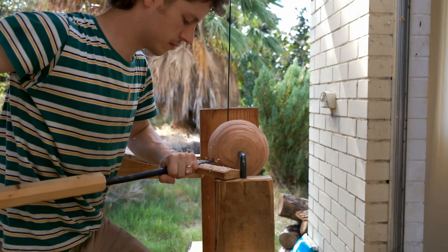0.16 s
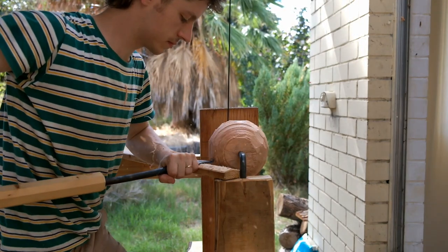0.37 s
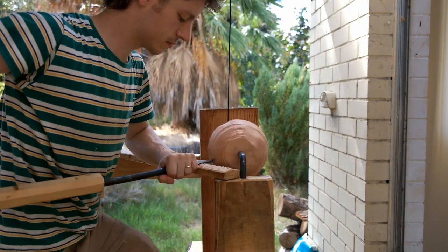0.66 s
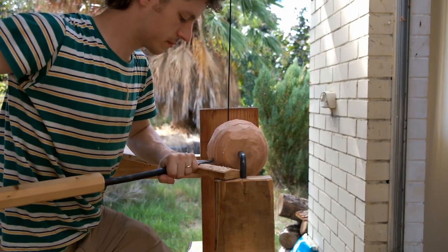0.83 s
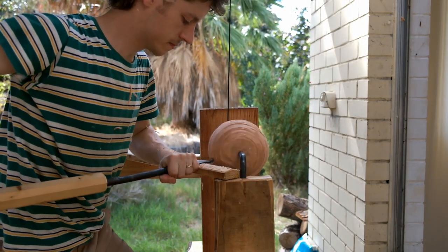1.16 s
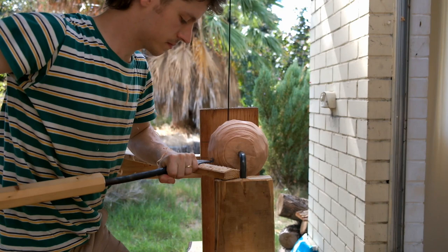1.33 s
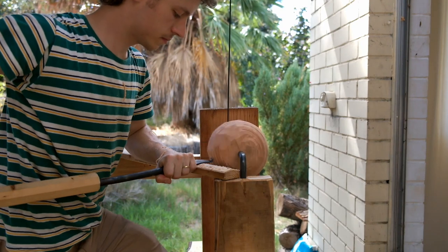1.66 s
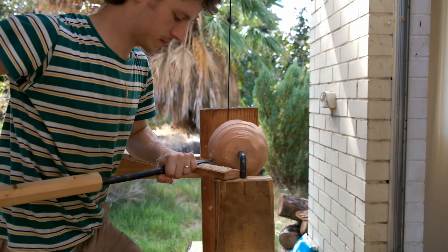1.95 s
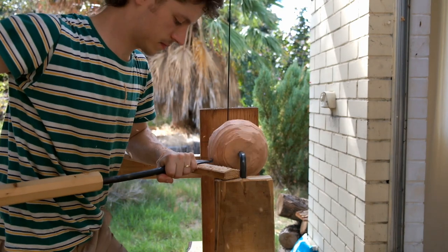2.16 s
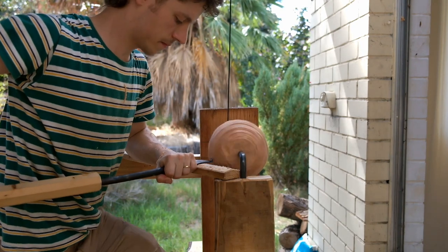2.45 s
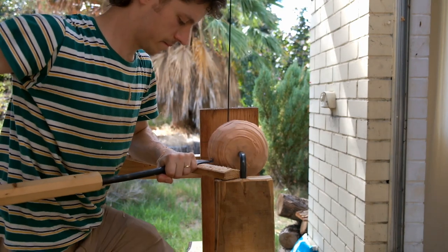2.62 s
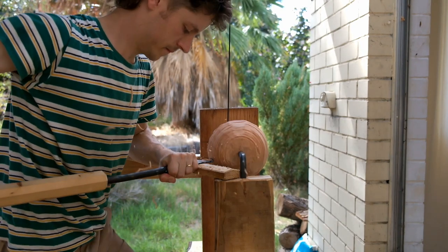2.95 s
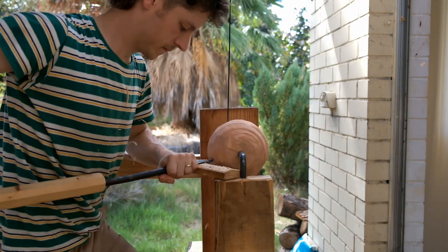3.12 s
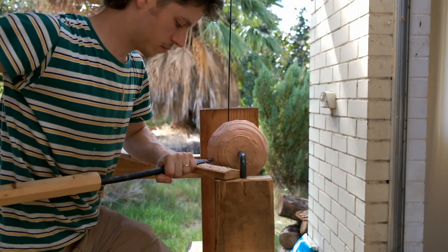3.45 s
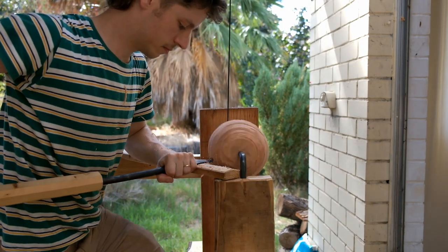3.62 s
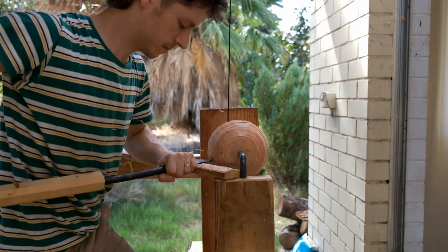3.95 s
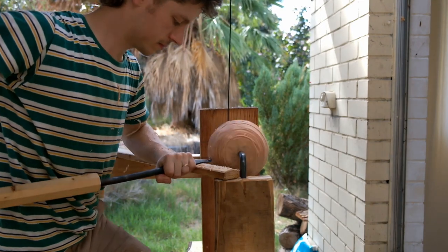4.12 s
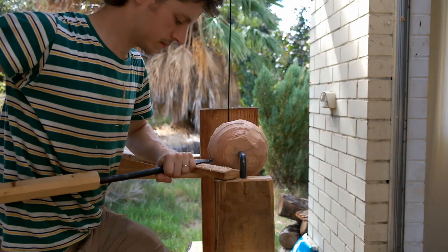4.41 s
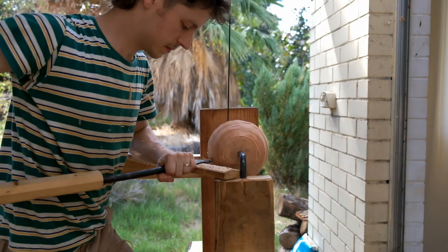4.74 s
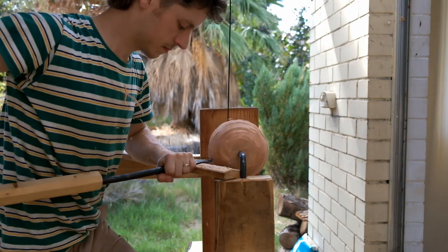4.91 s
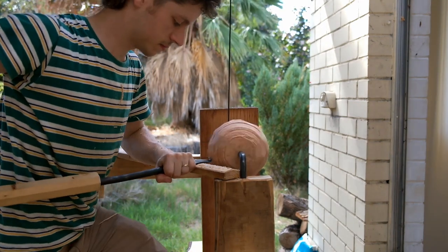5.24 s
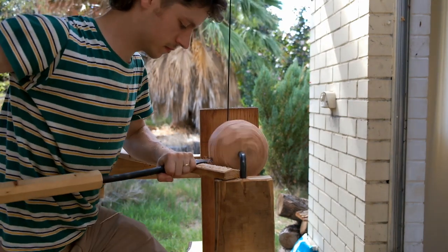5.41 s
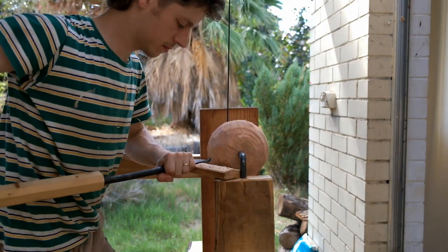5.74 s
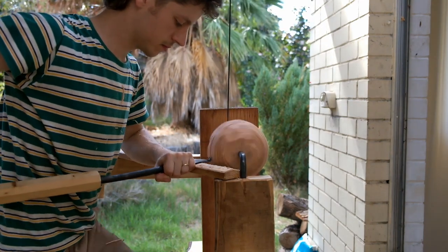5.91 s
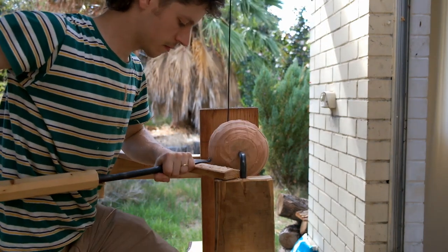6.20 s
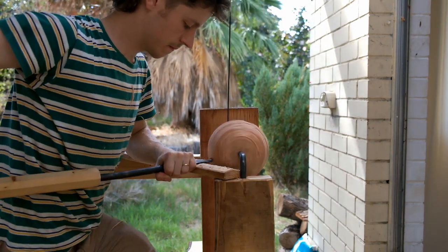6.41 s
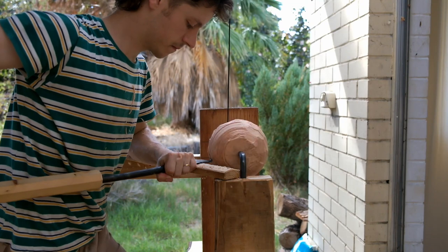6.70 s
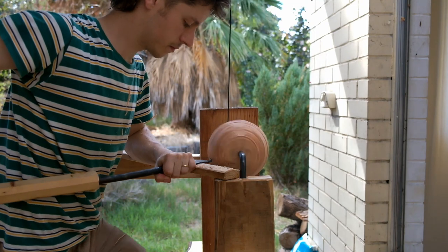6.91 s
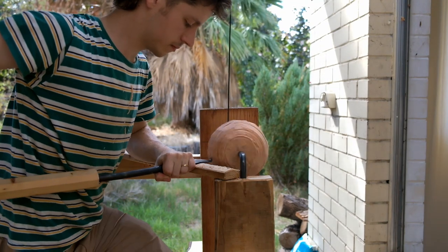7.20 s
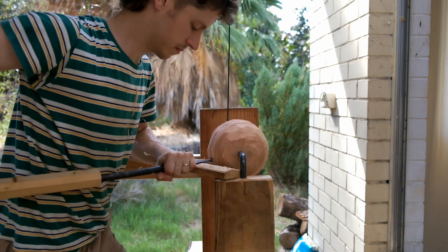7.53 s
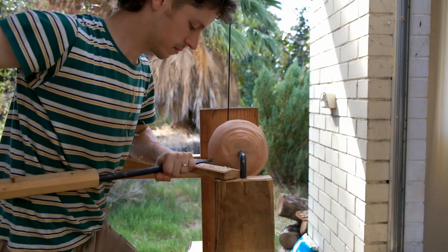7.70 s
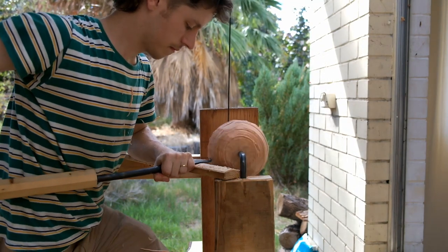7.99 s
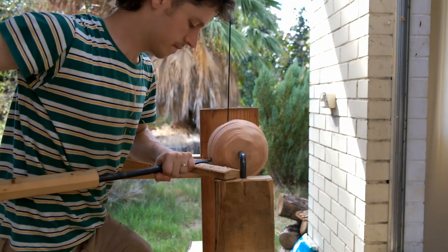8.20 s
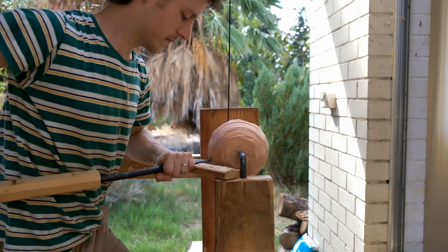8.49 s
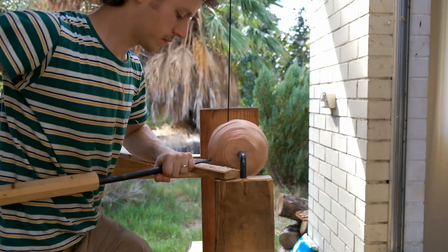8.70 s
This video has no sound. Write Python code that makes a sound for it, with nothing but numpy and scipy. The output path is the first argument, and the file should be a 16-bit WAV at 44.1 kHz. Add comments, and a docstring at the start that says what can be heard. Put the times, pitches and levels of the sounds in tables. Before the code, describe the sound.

Close mono sound of a foot-powered wood lathe on a brick porch. A stroke already under way at 0 s crunches briefly; further bursts of rasping, crackling wood fibre begin near 0.9, 1.9, 2.7, 3.6, 4.5, 5.4, 6.3, 7.3 and 8.2 s. Each lasts about 0.3 to 0.4 s and stutters as separate chips, bright and woody at full speed, heavier as the blank slows. The strongest bite comes near 2.9 s; strokes after 5.3 s are thumpier. In the gaps, wooden knocks with a slight steel ring fall near 1.4, 2.2, 3.9, 5.5 and 8.5 s, most firmly around 7.35 and 7.7 s. Small ticks, pattering shavings and short hoarse squeaks of the gouge rubbing, as at 3.5 and 7.1 s, precede strokes. A short porch tail follows everything. Soft garden noise rises slightly, with a faint wavering far engine and low rumble at the start and near 8.3 s.

```python
"""Pole lathe under a brick porch.

A gouge cuts a bowl blank in ten treadle strokes. Each bite is a run of chips: random fibre snaps, spread by
bending waves and rung by the lathe's resonances, brighter at full spin and heavier as the blank slows.
Decaying modes and noise make knocks, ticks and pattering shavings; dense snaps make the gouge slide.
The porch adds a short noise tail; filtered noise and sines murmur as garden, far engine, hum and rumble."""
import sys
import numpy as np
from scipy import signal
from scipy.fft import rfft, irfft, next_fast_len
from scipy.io import wavfile
from scipy.ndimage import map_coordinates

SR = 44100
rng = np.random.default_rng(int(sys.argv[2]) if len(sys.argv) > 2 else 0)


def generate_wav(sig):
    """Save sig (samples, or channels by samples) to the path in sys.argv[1] as 16-bit PCM at SR."""
    pcm = np.round(np.clip(np.atleast_2d(sig).T, -1, 1) * 32767).astype(np.int16)
    wavfile.write(sys.argv[1], SR, pcm)


N = 390726

# Lower against upper ring as the gouge works across the blank.
# Each row: time in seconds, lower ring in dB (the upper ring takes the opposite).
RING_BALANCE = [(0, 1.5), (2.2, 0.5), (3.8, 1), (6.5, 0.4), (8.4, -2.5)]


def cutting(frame_db=1.5):
    """Each chip is a burst of fractures that spreads through the wood and rings the lathe."""
    force = np.zeros(N)
    for start_s, length_s, level_db, (thump_db, body_db, crack_db) in chips():
        snaps = fractures(length_s, rate_per_s=750, spread_db=6.0)
        burst = signal.fftconvolve(snaps, bending())
        ring_db = np.interp(start_s, *np.transpose(RING_BALANCE))
        colour = [(150, thump_db + frame_db), (380, thump_db),
                  (650, body_db), (1150, body_db),
                  (1700, ring_db), (2400, ring_db),
                  (3200, -ring_db), (3700, -ring_db), (4500, crack_db)]
        chip = coloured(burst, lambda hz: amp(along(colour, hz)), size=2048)
        add(force, start_s, amp(level_db) * chip)
    return lathe(force, broad_db=-7.0)


# Bites of the edge. Each row: start in seconds, length in seconds, relative level in dB.
BITES = [(0, .066, -22), (.128, .026, -13), (0.153, 0.036, -13), (0.239, 0.044, -12.5), (0.898, 0.066, -24),
         (1.001, 0.041, -13.5), (1.058, 0.03, -11.5), (1.114, 0.013, -13.5), (1.127, 0.017, -7),
         (1.153, 0.041, -19.5), (1.219, 0.014, -13.5), (1.249, 0.027, -18), (1.928, 0.017, -11),
         (2.002, .007, -11), (2.015, 0.028, -10), (2.075, 0.02, -18), (2.093, 0.021, -8),
         (2.133, .028, -25), (2.251, 0.019, -23.5), (2.696, 0.034, -17), (2.751, 0.017, -17),
         (2.779, 0.018, -17), (2.795, .027, -11.5), (2.828, 0.032, -16), (2.868, .018, -12),
         (2.886, .022, -4.5), (2.911, 0.035, -14.5), (2.973, .03, -13), (3.014, .015, -18),
         (3.604, 0.026, -13.5), (3.694, 0.021, -11), (3.716, 0.027, -9), (3.773, 0.017, -20),
         (3.79, .022, -12), (3.814, 0.05, -13), (3.894, 0.03, -16), (4.503, 0.047, -15.5),
         (4.603, .013, -14.5), (4.618, 0.037, -9.5), (4.67, 0.038, -16.5), (4.711, .042, -11),
         (4.777, 0.026, -15.5), (4.814, .026, -19.5), (5.359, 0.038, -29), (5.402, 0.034, -22),
         (5.442, 0.0057, -10), (5.453, 0.038, -14), (5.5, 0.056, -24), (5.594, 0.034, -22),
         (5.679, 0.028, -25.5), (6.335, .031, -19.5), (6.378, 0.059, -20), (6.45, 0.035, -14.5),
         (6.499, .028, -11), (6.545, .066, -13), (6.634, .025, -25.5), (6.68, 0.023, -24.5),
         (7.342, 0.0078, -17), (7.38, 0.015, -13), (7.424, .046, -13.5), (7.474, 0.032, -13.5),
         (7.511, 0.042, -15.5), (7.55, 0.039, -13.5), (8.164, 0.0034, -21), (8.188, .015, -21),
         (8.221, .009, -18), (8.233, .014, -11), (8.259, 0.034, -13.5), (8.297, 0.033, -15.5),
         (8.334, .033, -13), (8.379, 0.057, -15.5), (8.476, .006, -24.5)]
# Chip colours are (thump dB, body dB, crack dB).
FULL_SPIN_DB, STANDSTILL_DB = (-1.5, -1, 1), (3, 4, -6)
ENTRY_DB = (-1, -1.5, 1)  # added as the edge enters a bite, taken away as it leaves
CHIP_S = 0.02  # nominal; a bite holds a whole number of chips
CHIP_LEVEL_SCATTER_DB, CHIP_COLOUR_SCATTER_DB = 0.5, 1.57
USUAL_BITE_DB, DEEP_THINNING = -14, 0.25  # dB off thump and body per dB above a usual bite


def chips():
    """Each bite breaks into chips: speed and an entering edge crack, a slow blank shakes the frame."""
    for start_s, length_s, level_db in BITES:
        count = max(round(length_s / CHIP_S), 1)
        thinning_db = DEEP_THINNING * (level_db - USUAL_BITE_DB) * np.array([1, 1, 0])
        for k, (size, *tint) in enumerate(rng.standard_normal((count, 4))):
            chip_s = start_s + k * length_s / count
            speed, stroke_db = spin(chip_s)
            entering = (count - 1 - 2 * k) / max(count - 1, 1)  # 1 to -1; 0 for a lone chip
            weights = [speed, 1 - speed, entering]
            motion_db = np.dot(weights, [FULL_SPIN_DB, STANDSTILL_DB, ENTRY_DB])
            colour_db = stroke_db - thinning_db + motion_db + CHIP_COLOUR_SCATTER_DB * np.array(tint)
            yield chip_s, length_s / count, level_db + CHIP_LEVEL_SCATTER_DB * size, colour_db


# Treadle strokes and the colour of the wood each one meets.
# Each row: start in seconds, length in seconds, thump in dB, body in dB, crack in dB.
STROKES = [(0, 1, -1.5, 0, -1.5), (.89, 0.87, -4.5, 1, -4), (1.88, 0.3, -5, -3, -.5),
           (2.66, 0.43, 1.5, -1.5, 0), (3.58, 0.39, 0, -0.5, 0.5), (4.5, 0.39, 0, -0.5, -0.5),
           (5.35, .3, 6, 1, -2), (6.3, 0.54, 5, 0.5, -1.5), (7.33, 0.47, 4.5, 0.5, 1),
           (8.14, .37, 3, -2.5, 0)]
SPIN_SKEW = 0.5  # under 1: the blank gains speed faster than it loses it


def spin(s):
    """Relative speed of the blank (0-1) at time s, and the colour of the nearest stroke."""
    start_s, length_s, *stroke_db = min(STROKES, key=lambda row: abs(row[0] + row[1] / 2 - s))
    progress = np.clip((s - start_s) / length_s, 0, 1)
    return np.sin(np.pi * progress ** SPIN_SKEW), np.array(stroke_db)


def fractures(length_s, rate_per_s, spread_db):
    """Fibres snap at random while the edge presses in and lets go."""
    size = max(int(length_s * SR), 32)
    sign = rng.choice([-1, 1], size)
    snaps = (rng.random(size) < rate_per_s / SR) * sign * amp(spread_db * rng.standard_normal(size))
    hiss = 0.072 * rng.standard_normal(size)
    pressure = np.sin(np.pi * np.arange(size) / size)
    return unit((snaps + hiss) * np.sqrt(pressure)) / np.sqrt(2)


def bending(delay_s=0.0061, dispersion=0.38, direct_hz=4500, prompt=0.26):
    """Bending waves in wood: treble comes straight from the edge, bass swells after it."""
    def envelope(hz, t):
        bass_lag = delay_s * (1000 / np.maximum(hz, 200)) ** dispersion
        lag_s = bass_lag / (1 + (np.minimum(hz, 7000) / direct_hz) ** 2)
        u = (t + 0.00027) / lag_s
        return np.sqrt(u) * np.exp(-u / 2)
    response = diffuse(envelope, seconds=0.093, size=64)
    response[0] += prompt
    # flatten the spectrum: the paths mainly delay and colour only mildly
    strength = np.abs(rfft(response, 2 ** 13))
    response = coloured(response, lambda hz: 1 / (strength + 0.81))
    return response / np.linalg.norm(response)


# Resonances of gouge, rest and blank.
# Each row: centre in Hz, width in Hz before the peak is sharpened, relative level in dB.
RESONANCES = [(151, 32, -11), (201.5, 27, -12.5), (424, 49, -12.5), (530.6, 43, -2), (619, 116, -3.5),
              (843, 78, -1.5), (944, 122, 2.5), (1110, 31, -3.5), (1237, 133, 3), (1679, 157, -0.5),
              (1880, 150, -6), (1970, 27, -16), (2317, 53, -1), (2424, 75, 0.5), (2625, 45, -3),
              (3209, 103, 3), (3600, 15, 0.5), (3830, 12.3, 2), (3976, 170, -3), (4780, 64, -4),
              (5646, 310, -7.5), (6290, 980, -15), (8060, 240, -15), (9140, 240, -12.5),
              (10880, 280, -14.5)]
# Broad colour of tearing wood. Each row: frequency in Hz, relative gain in dB.
TEARING = [(40, -62), (80, -12.5), (140, -16.5), (260, -11), (450, -1), (900, -4), (1400, -3.5), (2500, 0),
           (2850, -3.5), (3150, -1), (5000, -4), (7500, -7.5), (11000, -21), (16000, -26)]


def lathe(force, broad_db=-6):
    """Gouge, rest and blank ring on top of broad wood sound; white noise would keep its power."""
    def gain(hz):
        modes = sum((amp(db) * peak(hz, centre_hz, width_hz) ** 1.53) ** 2
                    for centre_hz, width_hz, db in RESONANCES)
        top_roll = 1 + (hz / 11000) ** 6
        broad = amp(along(TEARING, hz) + broad_db)
        return unit(np.sqrt(modes / top_roll + broad ** 2))
    return coloured(force, gain)


# Gouge and blank knock as the spin slows and turns round.
# Each row: time in seconds, strength in dB, thud and click in dB relative to the strength.
KNOCKS = [(1.368, -18.5, -6.5, -29), (2.16, -23, 3.5, -25), (3.178, -30, 10, 5), (3.895, -20.5, 11.5, -20),
          (4.099, -33.5, 6, -2.5), (5.53, -18.5, 7, -25), (5.682, -17, -8, -5), (5.992, -25.5, 0, 4),
          (7.347, -11, -20, -20), (7.699, -9.5, -7, -10), (8.538, -16, 2.5, -18), (8.59, -23, 0, -26)]
# Modes of the steel gouge, also used by rubs(). Each row: frequency in Hz, relative level in dB, t60 in seconds.
STEEL_MODES = [(817, 2, 0.18), (1310, -3.5, 0.19), (1560, -25, .08), (1847, -9, 0.097), (2350, -34, 0.11),
               (2564, -12, 0.057), (3340, -14.5, .1), (3900, -19.5, 0.097)]
# Modes of blank and frame. Each row: frequency in Hz, relative level in dB, t60 in seconds.
WOOD_MODES = [(140, -9, .15), (215, -5, 0.15), (304, -7, .12), (372.6, 1.5, 0.17), (447, -2.5, 0.19),
              (516, 7.5, 0.084), (597, -4, 0.19), (717, 8.5, 0.07), (1030, 6, 0.075)]
REBOUND_S, REBOUND_DB = 0.036, -8  # the blank drops back once after each knock


def knocks(steel_db=-13.0, wood_db=-18.5, click_db=-4, click_t60_s=0.078, rattle_db=-14, rattle_t60_s=0.18):
    """A blow rings the gouge, thuds twice in the wood and clicks; the loose frame rattles on."""
    ring, clicks, rattle = np.zeros((3, N))
    t = np.arange(SR // 2) / SR
    for s, db, thud_db, bright_db in KNOCKS:
        add(ring, s, amp(db + steel_db) * ringing(STEEL_MODES, attack_s=0.00061, detune=0.015))
        for late_s, loss_db in [(0, 0), (REBOUND_S, REBOUND_DB)]:
            thud = ringing(WOOD_MODES, attack_s=0.002, detune=0.021)
            add(ring, s + late_s, amp(db + thud_db + wood_db + loss_db) * thud)
        click_decay = amp(db + bright_db + click_db - 60 * t / click_t60_s)
        add(clicks, s, click_decay * rng.standard_normal(len(t)))
        taps = unit(rng.standard_normal(len(t)) * (rng.random(len(t)) < 400 / SR))  # 400 per second
        add(rattle, s, amp(db + rattle_db - 60 * t / rattle_t60_s) * taps)
    dull_curve = [(1200, 3.5), (2500, -7.5), (8000, -21)]  # Hz, dB
    dull = coloured(rattle, lambda hz: amp(along(dull_curve, hz)))
    return ring + lathe(clicks + dull)


def ringing(modes, attack_s, detune=0.015, scatter_db=2):
    """One blow: every mode splits into a close, decaying pair with new strengths."""
    t = np.arange(SR // 2) / SR
    x = np.zeros(len(t))
    for hz, db, t60_s in np.repeat(modes, 2, axis=0):
        decay = amp(db + rng.normal(0, scatter_db) - 60 * t / t60_s)
        x += decay * np.sin(2 * np.pi * (hz * rng.normal(1, detune) * t + rng.random()))
    return x * (1 - np.exp(-t / attack_s))


# Clearest ticks of chips and of the gouge on its rest. Each row: time in seconds, relative level in dB.
TICKS = [(0.6155, -31), (0.8021, -35), (1.624, -35), (1.8478, -26), (2.5591, -30.5), (3.4685, -26),
         (3.5354, -22), (4.2135, -32.5), (4.9586, -23), (5.288, -30.5), (5.913, -33), (7.861, -33),
         (7.9543, -29.5), (8.6722, -29), (8.7062, -22.5)]


def ticks(level_db=0, t60_s=0.061):
    """Light contacts: decaying noise bursts that excite mainly the upper resonances."""
    force, t = np.zeros(N), np.arange(SR // 8) / SR
    for s, db in TICKS:
        add(force, s, amp(db + level_db - 60 * t / t60_s) * rng.standard_normal(len(t)))
    light_curve = [(800, -13.0), (2500, -3.5), (8000, -16)]  # Hz, dB
    return coloured(lathe(force), lambda hz: amp(along(light_curve, hz)))


def shavings(rate_per_s=9, level_db=-49, spread_db=4, t60_s=0.02):
    """Loose shavings patter down on frame and ground: short noise bursts of random brightness."""
    force, t = np.zeros(N), np.arange(SR // 20) / SR
    for when, brightness in rng.random((int(rate_per_s * N / SR), 2)):
        decay = amp(level_db + spread_db * rng.standard_normal() - 60 * t / t60_s)
        chip = decay * rng.standard_normal(len(t))
        tinted = coloured(chip, lambda hz: peak(hz, 2000 + 5000 * brightness, 3500), size=512)
        add(force, when * N / SR, tinted)
    return lathe(force)


# The gouge slides on its rest while the blank spins back.
# Each row: start in seconds, length in seconds, relative grit level in dB, relative squeak level in dB.
RUBS = [(0.718, 0.11, -47.5, -41), (1.392, 0.081, -35.5, -41), (2.563, 0.032, -43.5, -50),
        (3.515, 0.043, -31, -36), (4.272, 0.064, -42, -40.5), (5.131, 0.037, -54, -47),
        (6.127, 0.061, -37.5, -39), (7.067, 0.029, -52, -44), (7.126, 0.049, -30, -39),
        (7.272, 0.024, -24, -44), (7.733, 0.03, -39, -34)]


def rubs(width_hz=48, upper_db=3):
    """Dry sliding: fine grit, and a hoarse squeak on the upper modes of the gouge."""
    grit, drag = np.zeros((2, N))
    for start_s, length_s, grit_db, squeak_db in RUBS:
        add(grit, start_s, amp(grit_db) * fractures(length_s, rate_per_s=5000, spread_db=8.5))
        add(drag, start_s, amp(squeak_db) * fractures(length_s, rate_per_s=8000, spread_db=1))
    squeak_curve = [(800, -14.5), (1300, 2.5), (2500, upper_db)]  # Hz, dB
    grit_curve = [(700, -15), (1600, -0.5), (7000, -6.5), (11000, -1.5)]

    def squeak_gain(hz):
        steel = sum(amp(db) * peak(hz, centre_hz, width_hz) ** 2.0 for centre_hz, db, _ in STEEL_MODES)
        return unit(steel * amp(along(squeak_curve, hz)))
    squeak = coloured(drag, squeak_gain)
    return squeak + coloured(lathe(grit), lambda hz: amp(along(grit_curve, hz)))


# Porch decay. Each row: frequency in Hz, t60 in seconds.
PORCH_DECAY = [(150, 0.7), (900, 0.56), (3000, 0.45), (7000, 0.31), (15000, 0.11)]


def porch(x):
    """Brick walls and roof answer with a short diffuse tail, treble dying first."""
    def envelope(hz, t):
        return amp(-60 * t / along(PORCH_DECAY, hz)) * (1 - np.exp(-t / 0.0035))
    tail = diffuse(envelope, seconds=0.93, size=256)
    return signal.fftconvolve(x, tail)[:N]


# Colour of garden and far traffic. Each row: frequency in Hz, relative gain in dB.
GARDEN_COLOUR = [(25, -4.5), (70, 5), (130, -9), (220, -5.5), (330, 2.5), (600, -6.5), (880, 4.5),
                 (1100, -1), (1500, -5), (3000, -11.5), (5000, -14.5), (7000, -24), (10000, -24),
                 (16000, -30)]
# Garden level before drift. Each row: time in seconds, level in dB.
GARDEN_LEVEL = [(0, -52), (1.7, -50), (3.3, -48.5), (7, -48.5), (8.86, -46.5)]
# Far engine before its waver. Each row: time in seconds, pitch in Hz, rms level in dB.
ENGINE = [(0, 83.2, -71), (2.8, 81.3, -72), (3.8, 97.6, -62.5), (5.3, 100.4, -57.5), (6.4, 95.2, -70.5),
          (7.3, 102, -58), (8.2, 99.2, -66), (8.86, 95.7, -47.5)]
# Low rumble. Each row: time in seconds, rms level in dB.
RUMBLE_LEVEL = [(0, -43), (.3, -45), (.45, -69), (2.3, -61.5), (4.7, -60.5), (7.8, -64), (8.3, -49.5),
                (8.86, -55)]


def outdoors(hum_hz=150, hum_peak_db=-64, drift_db=1):
    """Drifting garden noise, a wavering engine sine, a faint hum and a low noise rumble."""
    def wobble(count):
        return map_coordinates(rng.standard_normal(count), [np.linspace(0, count - 1, N)])
    air = unit(coloured(rng.standard_normal(N), lambda hz: amp(along(GARDEN_COLOUR, hz))))
    air_db = curves(GARDEN_LEVEL)[0] + drift_db * wobble(count=60)
    rumble = unit(coloured(rng.standard_normal(N), lambda hz: peak(hz, 40.3, 9.1) ** 2))
    engine_hz, engine_db = curves(ENGINE)
    waver = wobble(count=80)  # moves pitch by 1 Hz and level by 2 dB per unit
    engine_phase = 2 * np.pi * np.cumsum(engine_hz + waver) / SR
    engine = amp(engine_db + 2 * waver) * np.sqrt(2) * np.sin(engine_phase)
    hum = amp(hum_peak_db) * np.sin(2 * np.pi * hum_hz * np.arange(N) / SR)
    return amp(air_db) * air + amp(curves(RUMBLE_LEVEL)[0]) * rumble + engine + hum


def amp(db):
    """Decibels to gain."""
    return 10 ** (np.asarray(db) / 20)


def unit(x):
    """Scaled to rms 1."""
    return x / np.sqrt(np.mean(x ** 2) + 1e-20)


def along(points, hz):
    """(Hz, value) points read on a log frequency axis."""
    f, v = np.transpose(points)
    return np.interp(np.log(hz + 1), np.log(f + 1), v)


def curves(rows):
    """One value per sample for each column after the time."""
    s, *cols = np.transpose(rows)
    return [np.interp(np.arange(N) / SR, s, c) for c in cols]


def add(track, s, x):
    """Mix x into the track from time s."""
    start = int(np.clip(round(s * SR), 0, N))
    track[start:start + len(x)] += x[:N - start]


def coloured(x, gain, size=8192):
    """x through a causal minimum-phase filter with the given gain over frequency."""
    cepstrum = irfft(np.log(np.maximum(gain(np.fft.rfftfreq(size, 1 / SR)), 1e-6)))
    # fold the cepstrum onto positive time
    cepstrum[1:size // 2] *= 2
    cepstrum[size // 2 + 1:] = 0
    return signal.fftconvolve(x, irfft(np.exp(rfft(cepstrum))))[:len(x)]


def peak(hz, centre_hz, width_hz):
    """Gain of one resonance, 1 at its centre."""
    return hz * width_hz / np.hypot(centre_hz ** 2 - hz ** 2, hz * width_hz)


def diffuse(envelope, seconds, size):
    """A random response of energy 1 whose every frequency follows envelope(Hz, s)."""
    hz, t, z = signal.stft(rng.standard_normal(int(seconds * SR)), SR, nperseg=size)
    shape = envelope(hz[:, None], t)
    shape = shape / np.linalg.norm(shape, axis=1, keepdims=True)
    x = signal.istft(z * shape, SR, nperseg=size)[1]
    return x / np.linalg.norm(x)


def scene():
    """The lathe, its porch tail and the outdoors, in mono."""
    work = cutting() + knocks() + ticks() + shavings() + rubs()
    return (work + amp(-10.0) * porch(work) + outdoors())[None]


TOP_HZ = 16100


def record(dry):
    """Round off the highest peaks and keep nothing from TOP_HZ up."""
    held = dry / (1 + np.abs(dry) ** 6) ** (1 / 6)
    size = next_fast_len(N + SR // 2)
    in_band = np.fft.rfftfreq(size, 1 / SR) < TOP_HZ
    return irfft(rfft(held, size) * in_band, size)[:, :N]


dry = scene()
out = record(dry)
generate_wav(out)
```